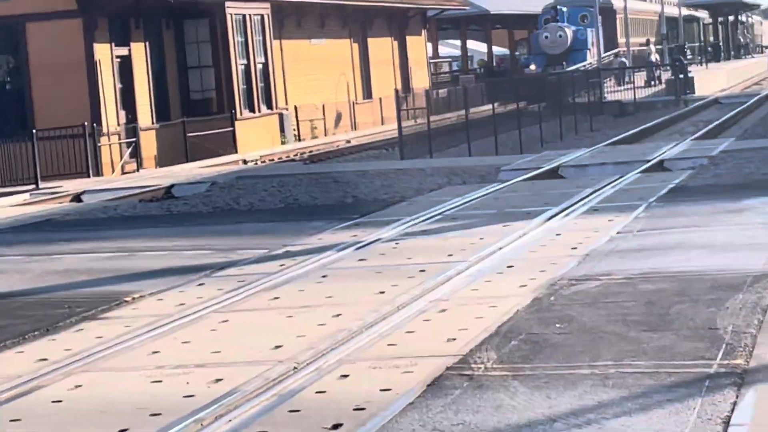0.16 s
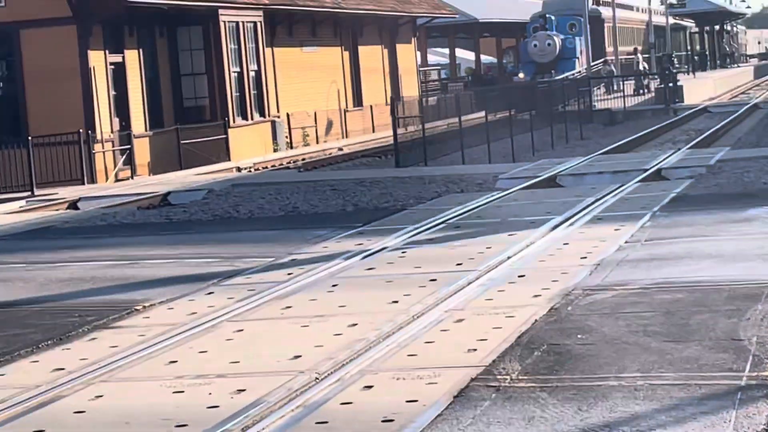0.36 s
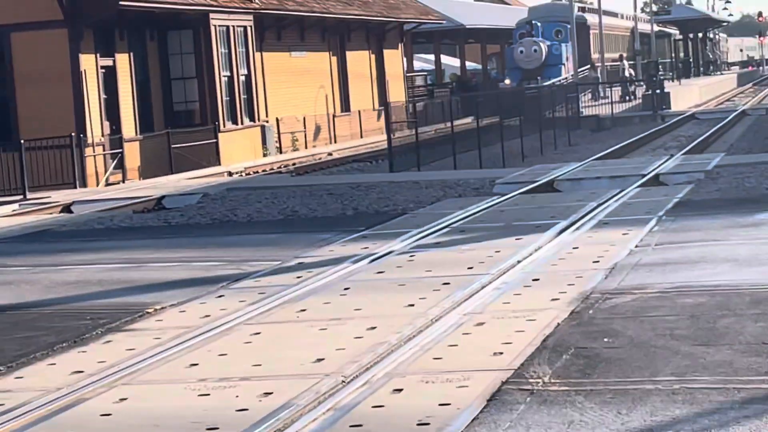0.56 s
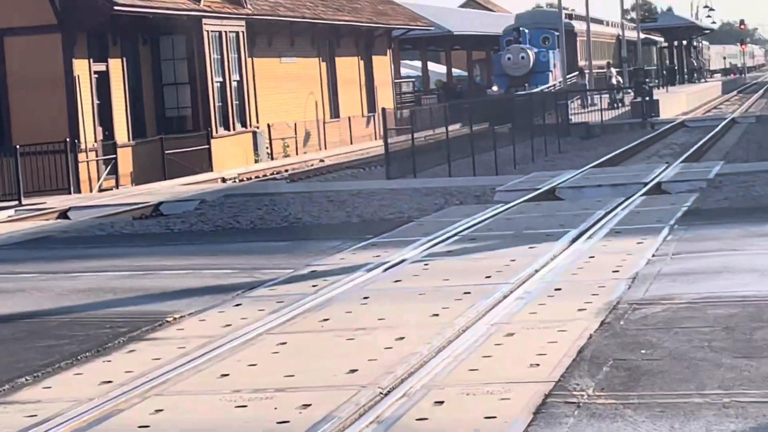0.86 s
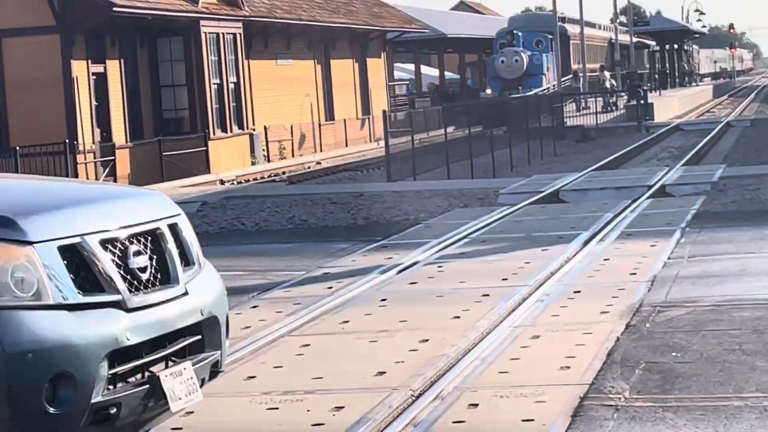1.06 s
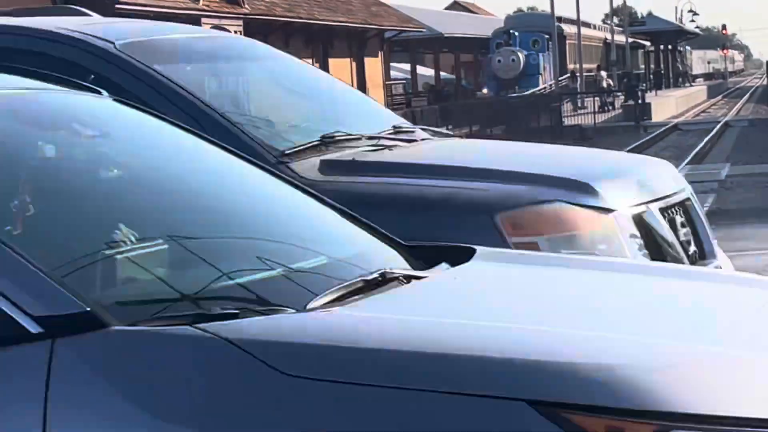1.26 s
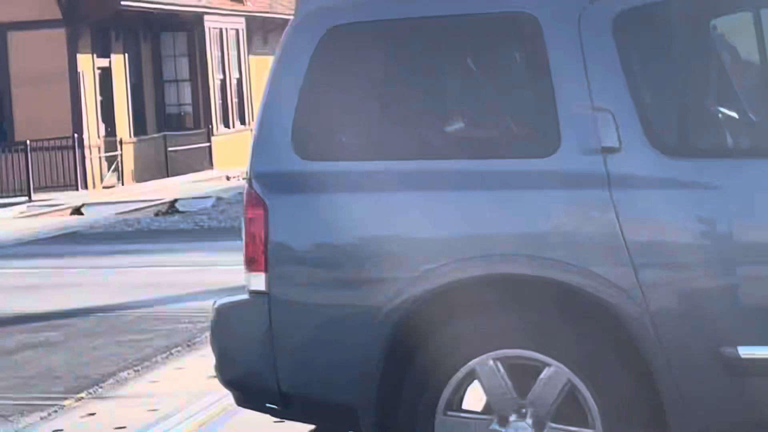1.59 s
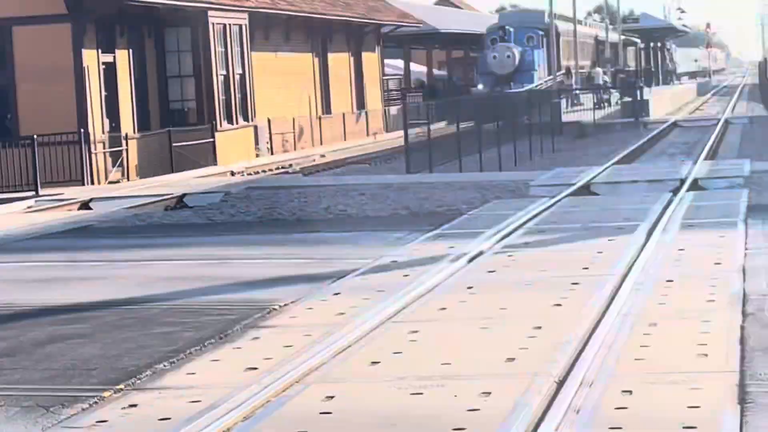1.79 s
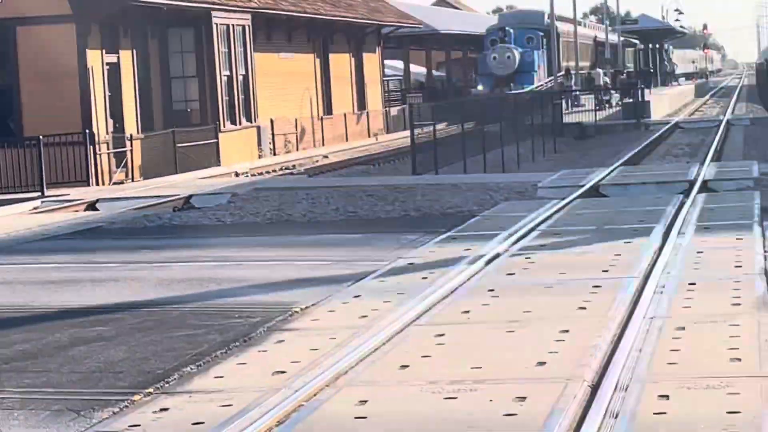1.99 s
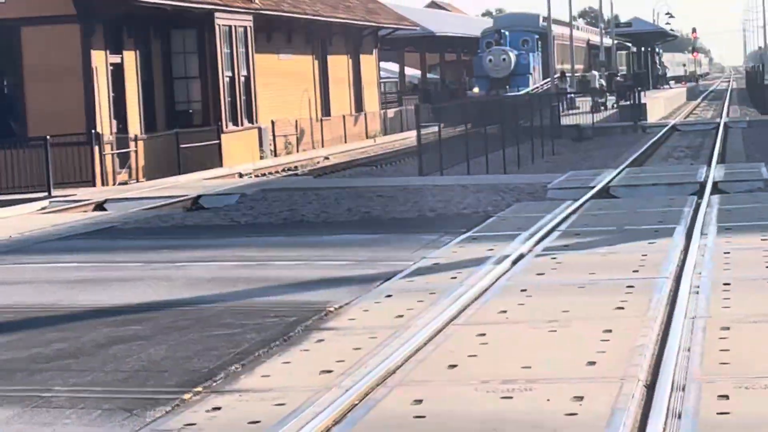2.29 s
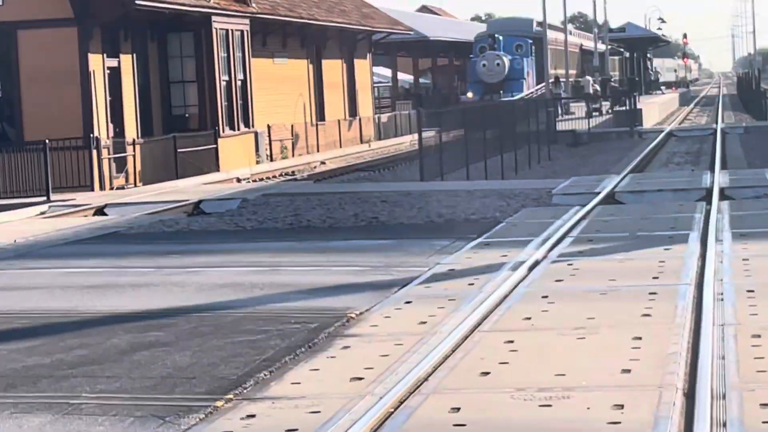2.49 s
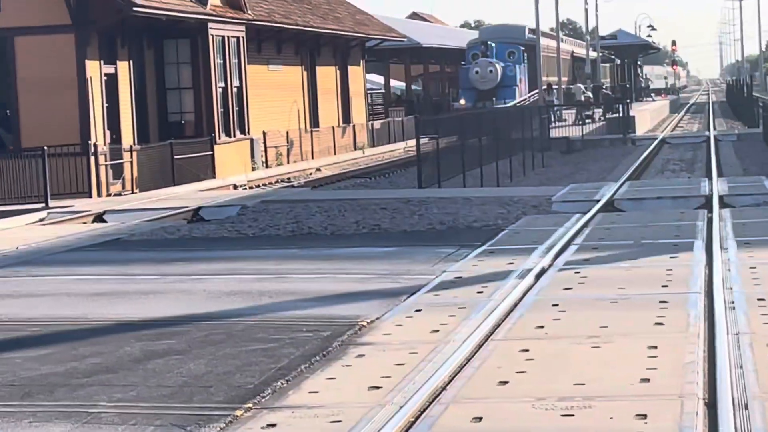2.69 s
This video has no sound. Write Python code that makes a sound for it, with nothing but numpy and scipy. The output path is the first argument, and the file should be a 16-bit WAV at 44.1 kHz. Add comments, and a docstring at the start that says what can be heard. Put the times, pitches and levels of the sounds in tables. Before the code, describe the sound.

Close outdoor phone pickup of cars bumping over rails: separate sharp slaps and low thumps first, then a crowded loud clatter with rattling loose parts and short wall echoes, finally receding tyre hiss and low rumble.

```python
"""Level crossing: two cars roll past a phone, over light wind and street rumble (shaped noise).
Tyre roar (noise and grit) swells and brightens as they come near; treads slap the rail grooves (noise cracks)
and scuff them (hiss). Wheels knock the panels, tyre air rings and bodies thump (short rough tones).
Loose parts rattle and the blows echo off the station wall."""
import sys
import numpy as np
from scipy import signal
from scipy.fft import rfft, irfft, next_fast_len
from scipy.io import wavfile
from scipy.ndimage import uniform_filter1d

SR = 44100
rng = np.random.default_rng(int(sys.argv[2]) if len(sys.argv) > 2 else 0)


def undo_db(level):
    """Turn decibels back into plain size, where 20 dB means ten times bigger."""
    steps = np.asarray(level, float) / 20
    return 10 ** steps


def persist_wave(psi):
    """Save psi, clipped to +-1, as 16-bit WAV."""
    counts = np.round(np.clip(psi, -1, 1) * 32767).astype(np.int16)
    wavfile.write(sys.argv[1], SR, np.atleast_2d(counts).T)


N = 125685


def level(x, rms_db):
    """Scales a sound to an rms level."""
    return x * undo_db(rms_db) / np.sqrt(np.mean(x ** 2))


def read(table, hz, column=1):
    """A table column on a log-frequency axis."""
    rows = np.array(table, float)
    return np.interp(np.log(np.maximum(hz, 1)), np.log(rows[:, 0]), rows[:, column])


def band(x, lo_hz, hi_hz):
    """Butterworth band-pass."""
    sos = signal.butter(2, [lo_hz, min(hi_hz, SR / 2.2)], "band", fs=SR, output="sos")
    return signal.sosfilt(sos, x)


def walk(rate_hz):
    """Random levels held 1 / rate_hz s and smoothed twice over that time."""
    hold = int(SR / rate_hz)
    steps = np.repeat(rng.standard_normal(N // hold + 1), hold)
    return 1.3 * uniform_filter1d(uniform_filter1d(steps, hold), hold)[:N]


def bands(source, spectrum, shared_db, flicker_db, tilt_db, bass_db):
    """Half-octave slices of a source, weighted by a spectrum; they swell together and flicker alone."""
    size = next_fast_len(N)
    hz = np.arange(size // 2 + 1) * SR / size
    full = rfft(source, size) * undo_db(read(spectrum, hz))
    octave = np.log2(np.maximum(hz, 1) / 1000)  # from 1 kHz
    out = 0
    for centre in np.arange(-5.5, 4.5, 0.5):
        overlap = np.clip(1 - 2 * abs(octave - centre), 0, 1)
        part = irfft(full * overlap, size)[:N]
        lift_db = bass_db * (centre < -2.6)  # slices centred up to 125 Hz
        out = out + part * undo_db(shared_db + flicker_db * walk(16) + tilt_db * centre + lift_db)
    return out


def add(out, start_s, sound):
    """Mixes a sound into out, trimmed at both ends."""
    i = int(start_s * SR)
    sound, i = sound[max(-i, 0):], max(i, 0)
    out[i:i + len(sound)] += sound[:N - i]


def blows(table, rough, rise):
    """Each blow is a short tone that swells fast, sags in pitch and dies, with a rough noise edge."""
    glide = -0.1  # pitch change per full length, as a share
    out = np.zeros(N)
    for peak_s, db, hz, length_ms in table:
        half_s = length_ms / 2000
        t = np.arange(-3 * half_s, 5 * half_s, 1 / SR)
        width_s = np.where(t < 0, rise * half_s, (2 - rise) * half_s)
        shape = np.exp(-0.5 * (t / width_s) ** 2)
        tone = np.cos(2 * np.pi * hz * (t + glide * t ** 2 / (4 * half_s)))
        edge = rng.standard_normal(SR // 2)
        for _ in range(2):
            edge = band(edge, hz / 1.79, hz * 2)
        edge = level(edge[-len(t):], 0)
        blow = shape * (tone + rough * edge)
        # roughness alters colour; energy follows the tone
        energy = (1 + 2 * rough ** 2) * np.sum((shape * tone) ** 2)
        blow = blow * np.sqrt(energy / np.sum(blow ** 2))
        add(out, peak_s + t[0], undo_db(db) * blow)
    return out


def street():
    """Distant traffic and a breeze on the phone: flickering shaped noise."""
    # Street and wind spectrum: (frequency [Hz], relative density [dB])
    spectrum = [(25, -32), (45, 7.5), (70, -1), (150, 3.5), (400, -7.5), (1300, -16), (1800, -13),
                (2400, -21), (4500, -38.5), (9000, -46.5), (15600, -76)]
    noise = rng.standard_normal(N)
    return level(bands(noise, spectrum, 0.5 * walk(3.83), 1.5, 0, 0), -31)


def tyres():
    """Hiss and grit under the tread; louder and brighter when near."""
    # Tyre roar spectrum: (frequency [Hz], relative density [dB])
    spectrum = [(30, 2.5), (70, 8.5), (130, 0), (250, -4.5), (500, -8), (1000, -12), (1600, -20),
                (3000, -30.5), (5500, -41), (9000, -49.5), (13500, -58), (15600, -55)]
    # Nearness of the cars: (time [s], roar before lift [dB], brightness [dB/octave])
    nearness = [(0, -33, 1), (.3, -32, 0), (.45, -30, -0.5), (.67, -30, 1), (.9, -29, 0.5),
                (1.1, -24.5, 0.5), (1.25, -23, 1), (1.45, -23.5, 2.5), (1.601, -23.5, 2), (1.75, -26, 2),
                (1.92, -28, 1.5), (2.07, -30.5, 2), (2.13, -31.5, 0.5), (2.299, -36.5, 0), (2.55, -37, 0),
                (2.85, -41, -1.5)]
    # Bass lift over the roar, drops out near 0.94 s, fullest near 2.3 s: (time [s], lift [dB])
    rumble = [(0, -2.5), (.5, -4.5), (.85, -1.5), (.94, -24), (1.03, 0), (1.6, -4), (2.0, -4.5), (2.3, 3),
              (2.85, -9)]
    grit_per_s, grit_spread_db, grit_top_db, grit_rms_db = 900, 2, 13, -6
    roar_lift_db = 5.5
    t = np.arange(N) / SR
    times_s, roar_db, brightness = np.transpose(nearness)
    near_db = np.interp(t, times_s, roar_db)
    tilt_db = np.interp(t, times_s, brightness)
    bass_db = np.interp(t, *np.array(rumble).T)
    chance = rng.random((N, 3))
    grain_db = np.minimum(-grit_spread_db * np.log(1 - chance[:, 2]), grit_top_db)
    grit = (chance[:, 0] < grit_per_s / SR) * np.sign(chance[:, 1] - 0.5) * undo_db(grain_db)
    tread = rng.standard_normal(N) + level(grit, grit_rms_db)
    roar = bands(tread, spectrum, 0.69 * walk(8.48), 0.73, tilt_db, bass_db)
    return level(roar, roar_lift_db) * undo_db(near_db)


def rattle(shaking):
    """Loose panels and bolts chatter while the crossing shakes: random taps follow its 20 ms mean."""
    taps_per_s, lo_hz, hi_hz = 350, 660, 2930
    chance = rng.random((N, 2))
    taps = (chance[:, 0] < taps_per_s / SR) * (2 * chance[:, 1] - 1)
    push = uniform_filter1d(abs(shaking), SR // 50)
    return level(band(taps, lo_hz, hi_hz), -12.5) * push


def scuffs():
    """Tread dragged over a groove on a car's far side: smeared hiss that starts quickly and fades."""
    # Scuffs: (start [s], rms before fade [dB], decay [ms])
    drags = [(1.561, -26, 18), (1.58, -25, 12), (1.797, -23.5, 15), (1.869, -32, 11), (1.903, -28.5, 26),
             (1.974, -32, 54), (2.06, -28.5, 13), (2.451, -44, 14)]
    lo_hz, hi_hz, rise_s = 1200, 3240, 0.004
    out, t = np.zeros(N), np.arange(SR // 5) / SR
    for start_s, rms_db, decay_ms in drags:
        hiss = level(band(rng.standard_normal(len(t)), lo_hz, hi_hz), rms_db)
        add(out, start_s, hiss * np.minimum(t / rise_s, 1) * np.exp(-t * 1000 / decay_ms))
    return out


def thumps():
    """Suspension and body thump: low, nearly clean tones."""
    # Thumps: (peak time [s], level [dB], pitch [Hz], length [ms])
    table = [(0.311, -24, 82, 28), (0.453, -13.5, 87.5, 14), (0.607, -17.5, 109, 16),
             (0.652, -22, 60.6, 38), (0.793, -15.5, 75.6, 22), (0.872, -22.5, 80, 30),
             (1.076, -11.5, 70, 20), (1.145, -12.5, 122, 15.5), (1.18, -12, 68.6, 26),
             (1.31, -8.5, 88.5, 12.7), (1.444, -11, 75.3, 52), (1.531, -12.5, 110, 9.8),
             (1.6, -17.5, 52, 39), (1.628, -10.5, 137, 8), (1.698, -12.5, 88.5, 32), (1.803, -11, 120, 9.1),
             (1.882, -17, 76.5, 70), (2.286, -17.5, 70, 14.7), (2.516, -24, 71.4, 32)]
    return blows(table, rough=0.16, rise=0.84)


def rings():
    """Air inside the tyres rings after a bump: low rough tones."""
    # Rings: (peak time [s], level [dB], pitch [Hz], length [ms])
    table = [(0.432, -21.5, 172, 59), (0.533, -20, 263, 17.8), (0.556, -23.5, 165, 77),
             (0.599, -27.5, 248, 31), (0.636, -20, 280.6, 51.6), (0.772, -14, 336, 8.6),
             (0.772, -23.5, 149, 54.4), (0.85, -23, 151, 20), (0.853, -18, 348, 7), (1.057, -17, 326, 12),
             (1.074, -11, 161, 13), (1.181, -14, 234, 18), (1.227, -17.5, 263, 18.7),
             (1.235, -17.5, 151, 16), (1.299, -16, 174, 20), (1.309, -12.5, 280, 9.8),
             (1.422, -8.5, 236, 13.5), (1.458, -11.5, 262, 9.76), (1.492, -18, 217, 37),
             (1.602, -9, 201, 11), (1.693, -9.5, 248, 16.6), (1.815, -9.5, 254, 10.3),
             (1.847, -16.5, 169, 22), (1.9, -13, 212, 15.8), (2.032, -15, 207, 41.8),
             (2.564, -22.5, 186, 9.3)]
    return blows(table, rough=0.49, rise=0.83)


def knocks():
    """Crossing panels knocked by a wheel: short rough tones."""
    # Knocks: (peak time [s], level [dB], pitch [Hz], length [ms])
    table = [(0.478, -24.5, 634, 4), (0.505, -30, 820, 3.2), (0.594, -17, 560, 5.1),
             (0.619, -13.5, 1390, 3), (0.825, -17.5, 556, 11.5), (0.846, -13.5, 1420, 4.2),
             (0.979, -17.5, 1020, 5.9), (1.034, -20.5, 833, 17.4), (1.042, -17.5, 430, 19.4),
             (1.048, -14, 1006, 5.1), (1.062, -14.5, 636, 6.7), (1.164, -9, 920, 3.5),
             (1.179, -8.5, 790, 4.4), (1.186, -14, 400, 16.2), (1.193, -13, 1360, 1.5),
             (1.24, -5.5, 530, 6.3), (1.272, -19.5, 465, 19.3), (1.283, -11, 1120, 1.9),
             (1.381, -17.5, 1090, 7.7), (1.413, -12, 780, 5.9), (1.427, -15, 1500, 2),
             (1.43, -14, 460, 9.2), (1.441, -11, 400, 21), (1.442, -12.5, 1500, 1.7), (1.447, -20, 375, 11),
             (1.455, -24, 725, 11.6), (1.471, -9, 527, 4.9), (1.488, -18.5, 790, 11),
             (1.555, -13.5, 735, 3.2), (1.564, -17.5, 400, 16), (1.595, -15, 1000, 2),
             (1.612, -14.5, 1110, 3.8), (1.618, -14, 640, 9.9), (1.62, -16, 1100, 2.4),
             (1.659, -20, 1200, 4), (1.673, -11, 570, 5.5), (1.672, -15.5, 1500, 2.7),
             (1.687, -14.5, 637, 5), (1.798, -21, 920, 3.3), (1.808, -24, 880, 3.2),
             (1.863, -15.5, 660, 3.7), (1.888, -18, 1040, 3.2), (1.936, -23.5, 654, 9.3),
             (2.013, -25.5, 1010, 7.5)]
    return blows(table, rough=0.49, rise=0.73)


def slaps():
    """Tread slaps a rail edge: a broad crack of tread on steel with a short scatter after it."""
    # Slaps: (start [s], level [dB], air before lift [dB])
    hits = [(0.3541, -18, -38), (0.392, -19.5, -27), (0.407, -19, -32), (0.412, -10.5, -38),
            (0.4292, -12.5, -31.5), (0.518, -6, -44.5), (0.5347, -11, -32), (0.5798, -21, -26.5),
            (0.6156, -21, -38), (0.8443, -23, -40), (0.7463, -18.5, -32.5), (0.751, -6, -42),
            (0.7644, -14.5, -34), (0.778, -25, -31), (1.0325, -18, -19), (1.0436, -14.5, -28),
            (1.067, -19.5, -22), (1.164, -9.5, -22), (1.18, -5.5, -20.5), (1.193, -20.5, -24),
            (1.2781, -4, -34), (1.3794, -11, -24), (1.398, -23, -15), (1.4126, -18.5, -11.5),
            (1.4386, -25, -26), (1.6716, -26.5, -33), (1.6847, -16, -28), (1.8885, -9, -35)]
    crack_ms, tail_ms, tail_db, air_lift_db = 0.2, 7.9, -28, 21.5
    out, t = np.zeros(N), np.arange(3000) / SR
    shape = np.exp(-t * 1000 / crack_ms) + undo_db(tail_db) * np.exp(-t * 1000 / tail_ms)
    for start_s, db, air_db in hits:
        grains = np.sign(rng.standard_normal((2, len(t)))) * shape
        crack = band(grains[0], 1300, 3900)
        crack = 0.61 * crack / abs(crack).max()
        air = undo_db(air_db + air_lift_db) * band(grains[1], 6800, 9100)
        add(out, start_s, undo_db(db) * (crack + air))
    return out


def echo(hits):
    """Station wall: a decaying noise tail that the blows excite."""
    t60_s, rise_s, echo_db = 0.12, 0.0095, -10
    t = np.arange(SR // 3) / SR
    tail = rng.standard_normal(len(t)) * undo_db(-60 * t / t60_s) * np.minimum(t / rise_s, 1)
    tail = tail / np.sqrt(np.sum(tail ** 2))
    return undo_db(echo_db) * signal.fftconvolve(hits, tail)[:N]


def ports(sound, column):
    """Two microphone ports hear a sound with their own phase, balance and unshared reflections."""
    # Port phase: (frequency [Hz], left lead [rad])
    leads = [(2600, 0.02), (4400, 1.33), (6600, 1.7), (9400, 5.5), (12800, 8.9), (16000, 22)]
    # Added phase, keyed by column, 1 coming and 3 leaving: (frequency [Hz], left lead [rad])
    turning = {1: [(1150, -.02), (1640, -1.2), (1900, .02)], 3: [(650, .15), (1030, .55), (1640, -.3)]}
    # Added phase: (frequency [Hz], left lead [half turns])
    half_turns = [(0, 0), (400, 0), (4900, 0), (5400, 0), (7000, 1), (8200, 1), (10600, 2), (12200, 2),
                  (13300, 3), (15000, 3)]
    # Sides: (frequency [Hz], coming left over right [dB], coming unshared [dB],
    #         leaving left over right [dB], leaving unshared [dB])
    sides = [(60.4, -3.2, -105, 0.51, -80), (400, 2, -34, -0.36, -28), (805, 0.4, -15, -1.8, -10.5),
             (1500, 6.5, -27, -0.34, -13.5), (2500, 1, -3.5, 0.59, -8.5), (4830, -0.4, -17, -0.32, -18)]
    size = next_fast_len(N + SR // 10)
    hz, full = np.arange(size // 2 + 1) * SR / size, rfft(sound, size)
    smear = rng.standard_normal(4000) * np.exp(-np.arange(4000) / 1300)
    smear = smear / np.sqrt(np.sum(smear ** 2))
    apart = rfft(smear, size) * undo_db(read(sides, hz, column + 1))
    points = leads + turning[column] + [(f, k * np.pi) for f, k in half_turns]
    phase = np.interp(hz, *np.array(sorted(points)).T)
    lead = np.exp(1j * phase / 2) * undo_db(read(sides, hz, column) / 2)  # half to each port
    left = irfft(full * (1 + apart) * lead, size)[:N]
    right = irfft(full * (1 - apart) / lead, size)[:N]
    return np.array([left, right])


def scene():
    """Mixes the sources; the stereo image fades from coming to leaving as the cars pass."""
    passes_s, swing_s = 1.28, 0.67
    hits = slaps() + knocks()
    hits = hits + rattle(hits) + rings() + scuffs() + thumps()
    sound = hits + echo(hits) + tyres() + street()
    gone = (1 + np.tanh((np.arange(N) / SR - passes_s) / swing_s)) / 2
    return ports(sound * (1 - gone), column=1) + ports(sound * gone, column=3)


def roll_off(x):
    """The treble ends steeply here."""
    return signal.sosfilt(signal.butter(12, 16480, fs=SR, output="sos"), x)


def record(dry):
    """The phone rounds the loudest peaks and cuts the lowest bass and the top."""
    rounded = np.tanh(0.82 * dry) / 0.79
    high_pass = signal.butter(3, 42, "high", fs=SR, output="sos")
    low_pass = signal.ellip(6, 0.2, 40, 15900, fs=SR, output="sos")
    mix = signal.sosfilt(low_pass, signal.sosfilt(high_pass, rounded))
    return roll_off(mix)


dry = scene()
out = record(dry)
persist_wave(out)
```